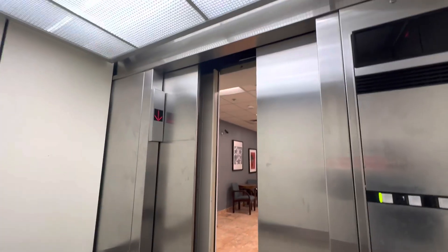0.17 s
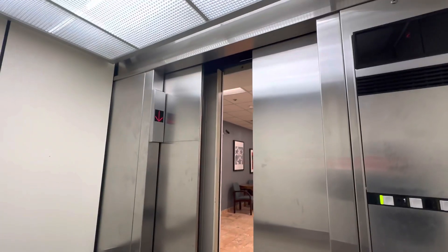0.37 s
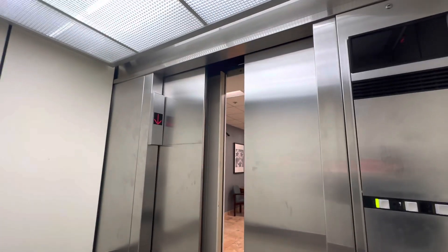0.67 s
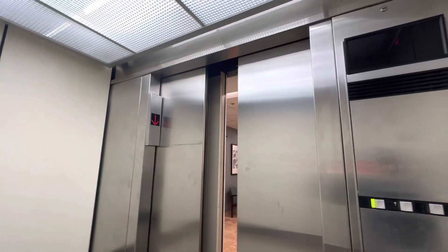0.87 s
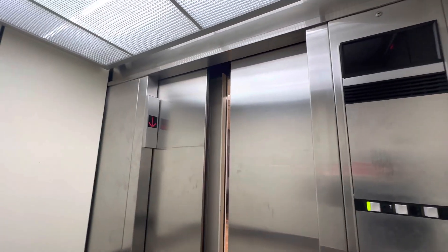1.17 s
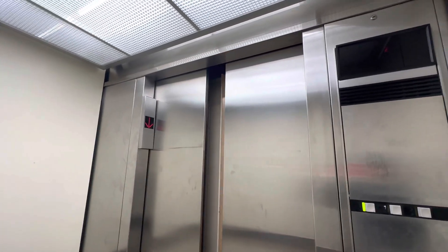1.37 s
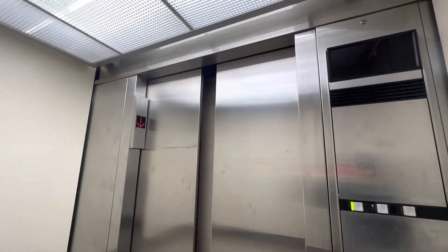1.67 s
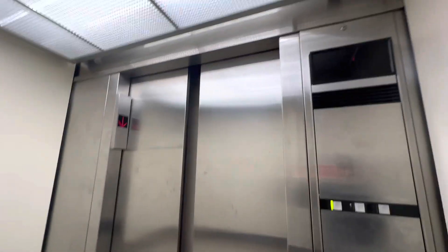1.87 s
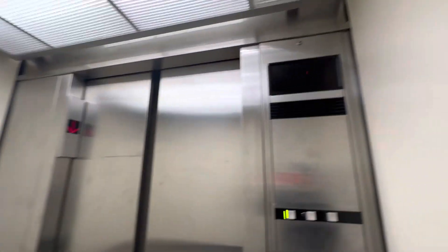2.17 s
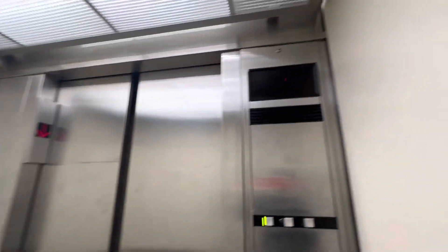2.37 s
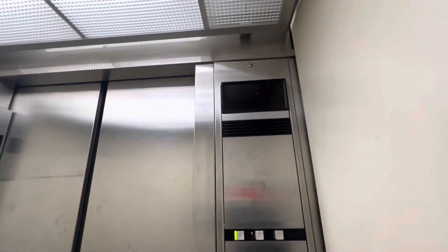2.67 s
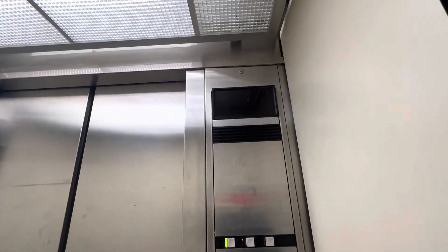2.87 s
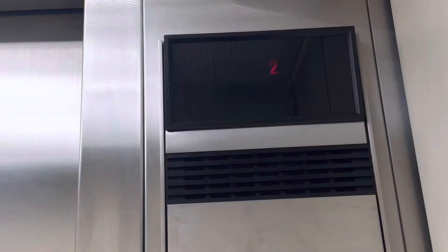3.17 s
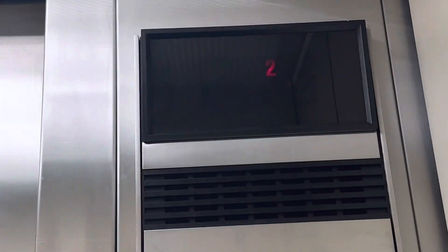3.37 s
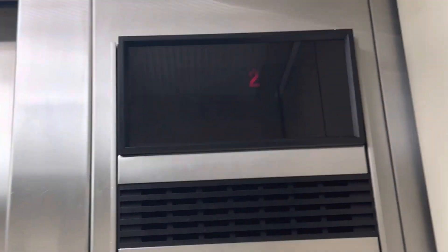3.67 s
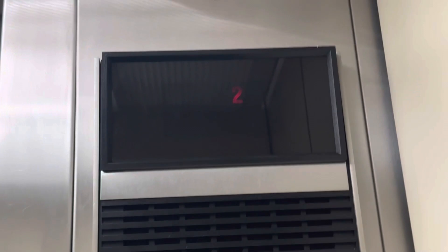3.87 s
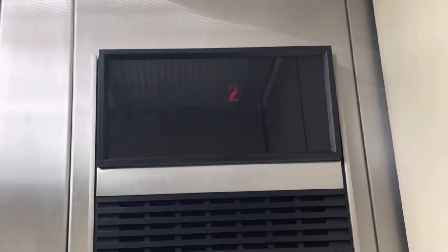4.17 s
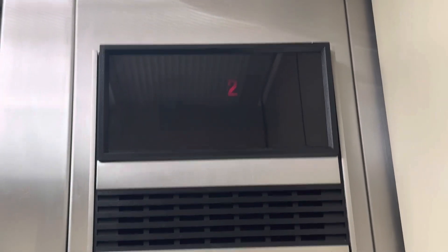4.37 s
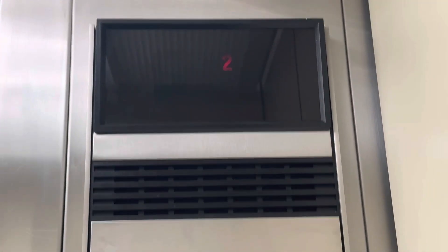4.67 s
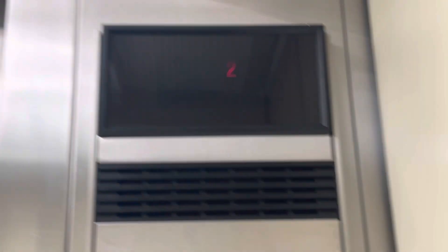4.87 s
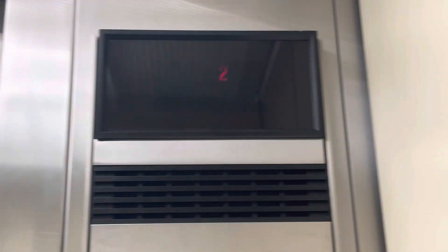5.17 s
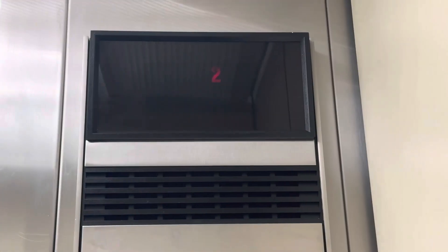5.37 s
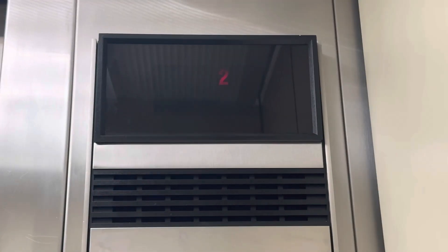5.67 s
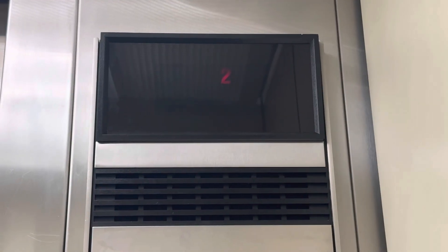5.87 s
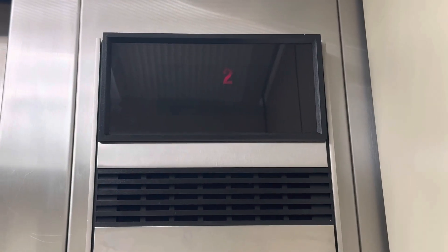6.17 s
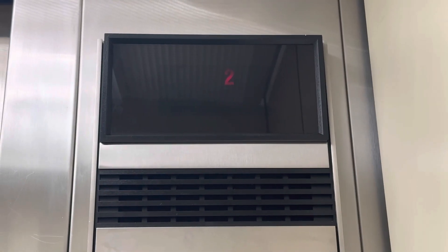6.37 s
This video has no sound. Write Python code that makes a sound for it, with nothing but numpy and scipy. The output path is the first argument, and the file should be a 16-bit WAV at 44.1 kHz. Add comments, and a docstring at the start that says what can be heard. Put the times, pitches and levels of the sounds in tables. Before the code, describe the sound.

A steel elevator door rumbles shut with roller squeaks, then a latch clicks and the car starts moving over a steady fan hum.

```python
"""Inside a steel lift car

A ceiling fan hums and blows, and the air of the car booms in its low modes. The door rumbles shut on
squeaking rollers, with grit ringing in the sheet steel, cloth rustling and small ticks. Halfway the
microphone narrows its focus, which dulls the air noise and pulls it to the centre. Then a latch
clicks, the car jolts, and boom and hum grow a little as it gathers speed."""
import sys
import numpy as np
from scipy import signal
from scipy.io import wavfile

SR = 44100
rng = np.random.default_rng(int(sys.argv[2]) if len(sys.argv) > 2 else 0)


def waveform_to_disk(signal):
    """Save audio, clipped to [-1, 1], as 16-bit WAV at the path in sys.argv[1]."""
    frames = np.transpose(np.atleast_2d(signal))
    scaled = np.clip(frames, -1, 1) * 32767
    samples = np.round(scaled).astype(np.int16)
    wavfile.write(sys.argv[1], SR, samples)


N = 287091
TIME = np.arange(N) / SR
FOCUS_S, FOCUS_FADE_S = 3.05, 0.063   # the microphone goes from wide to narrow
BASS_SWELL_S, BASS_SWELL_TAKES_S = 5.1, 0.57   # hum and low modes grow late in the ride


# The partials of the hum. Each row: multiple of the hum pitch, relative level in dB.
HUM_PARTIALS = [(1, 1), (2, -10), (3, -24)]
# Thin whines. Each row: pitch in Hz, waver in Hz, base level in dB in wide focus, then in narrow focus.
WHINES = [(540, 2.2, -49.5, -64), (616, 2.8, -59.5, -68), (683.2, 2.2, -53.5, -59.5),
          (805, 4.7, -66.5, -67), (1006, 3.0, -65.5, -73)]

def fan_motor():
    """The motor hums with two overtones, stepping up under way; thin whines waver above it."""
    rest_hz, travel_hz, rest_db, travel_gain_db = 121.45, 122.6, -38, 2.5
    pitch_hz = rest_hz + (travel_hz - rest_hz) * ramp(4.6, takes_s=0.56) + 0.578 * drift(2.86)
    level_db = rest_db + travel_gain_db * ramp(BASS_SWELL_S, BASS_SWELL_TAKES_S) + 1.5 * drift(2.5)
    phase, hum = phase_of(pitch_hz), 0
    for multiple, db in HUM_PARTIALS:
        gain = from_db(db + 1.06 * drift(6))
        slip_rad = 0.15 * multiple * drift(7) + rng.uniform(0, 2 * np.pi)
        hum += gain * np.sin(multiple * phase + slip_rad)
    out = np.sqrt(2) * from_db(level_db) * hum * sides_db(-0.7, 0.7)
    for hz, waver_hz, wide_db, narrow_db in WHINES:
        phase = phase_of(hz + waver_hz * drift(5.25))
        whine = np.sin([phase, phase + 2])   # standing waves shift the phase between the ears
        out += from_db(by_focus(wide_db, narrow_db) + 2.46 * drift(2.9)) * whine * sides_db(5, 2.5)
    return out


# The boom of the car. Each row: mode in Hz, resonator width in Hz, relative level in dB,
# left-right likeness (1 is mono).
AIR_MODES = [(42.05, 24, -13, 0.88), (73.4, 28, -7.5, 1), (90, 9.8, -0.5, 1), (108.7, 5.4, -13.5, 0.99),
             (121.66, 11.6, -3.5, 1), (149, 9, -7, 0.99), (171.4, 9.4, -13.5, 1), (223.5, 17.4, -1, 1),
             (291.6, 20.4, -9, 1), (318.8, 11, -12, 0.47), (360.3, 18.4, -9, 0.63), (402, 28, -11.5, 0.029),
             (434.7, 17, -13.5, 0.18)]

def car_boom():
    """Turbulence keeps the air modes ringing; they grow as the door closes and as the car travels."""
    low_db = -40 - 4.5 * (1 - ramp(0, takes_s=0.36))   # weak while the doorway is wide open
    upper_db = -44 - 3.5 * (1 - ramp(0, takes_s=2.4))   # growing until the door seals
    speed = ramp(4.24, takes_s=0.66)
    bass_swell = ramp(BASS_SWELL_S, BASS_SWELL_TAKES_S)
    out = 0
    for hz, width_hz, mode_db, likeness in AIR_MODES:
        turbulence = rng.standard_normal((2, N))
        ring = resonate(resonate(turbulence, hz, width_hz), hz, 2 * width_hz)
        rest_db = low_db if hz < 200 else upper_db
        travel_db = 0.5 * bass_swell if hz < 250 else 4 * speed
        out += from_db(mode_db + rest_db + travel_db) * spread(unit_rms(ring), likeness)
    shudder = swell(3.4, peak_db=-7, rise_s=0.075, fall_s=0.16)   # the start shakes all modes
    return out * sides_db(-0.6, 0.6) * (1 + shudder)


# Dull thuds. Each row: start in seconds, level in dB, pitch in Hz, seconds to fall 60 dB.
JOLTS = [(0.24, -15, 146.6, 0.136), (0.28, -27, 94.6, 0.27), (3.692, -27, 93, 0.38), (3.7, -30, 43.2, 0.69),
         (3.72, -34.5, 350.5, 0.25), (3.764, -13.5, 102, 0.14), (3.795, -19.5, 87.03, 0.22),
         (3.848, -23.5, 115, 0.17), (3.752, -27.5, 209, 0.26), (3.86, -27, 72.47, 0.22)]

def jolts():
    """A soft push sets a wall panel swinging briefly."""
    out, t = np.zeros(N), np.arange(SR // 2) / SR
    for start_s, db, hz, t60 in JOLTS:
        attack = np.minimum(t * hz / 1.47, 1)   # about one and a half cycles
        at = round(start_s * SR)
        out[at:at + len(t)] += attack * from_db(db - 60 * t / t60) * np.sin(2 * np.pi * hz * t)
    return out * sides_db(-0.5, 0.5)


# The body of the door leaf. Each row: resonance in Hz, width in Hz, relative level in dB.
DOOR_MODES = [(393, 54, 7.5), (586, 190, 1.5), (706, 67, -3), (780, 340, -11), (444, 40, -1), (532, 40, -1),
              (920, 32, 0), (1002, 40, 0.5), (1150, 70, 0.5), (1303, 120, -3), (2023, 680, -11.5)]

def door_rumble():
    """Rollers on a bumpy track rumble in the door leaf, each resonance surging on its own."""
    rattle_db, surge_db, stop_s, fade_db_per_s = 1.5, 3.5, 2.45, 44
    rattle = rng.standard_normal((2, N)) * from_db(rattle_db * drift(45))
    leaf = 0
    for k, (hz, width_hz, db) in enumerate(DOOR_MODES):
        leaf += (-1) ** k * from_db(db + surge_db * drift(4.6)) * resonate(rattle, hz, width_hz)
    leaf = butterworth(leaf, 4, 3200, "lowpass")   # rubber tyres pass no treble
    level_db = -46 - fade_db_per_s * np.maximum(TIME - stop_s, 0)
    return unit_rms(leaf) * from_db(level_db) * sides_db(1.5, -1.5)


# Roller squeaks. Each row: start and length in seconds, first and last pitch in Hz, level in dB.
SQUEAKS = [(.2, .035, 2870, 2850, -58), (.248, .052, 2850, 2790, -48.5), (.3, .045, 2800, 2830, -53),
           (.275, .082, 2990, 3010, -54), (.343, .025, 2790, 2780, -51), (.345, .055, 2330, 2350, -59),
           (.408, .035, 2750, 2900, -56), (.425, .035, 2670, 2645, -56), (1.29, .04, 2900, 2900, -66)]

def roller_squeaks():
    """A door roller sticks and slips, in tones that glide, waver and flutter."""
    edge_s, waver_hz, flutter_db = 0.008, 26, 3
    out = 0
    for start_s, length_s, first_hz, last_hz, db in SQUEAKS:
        end_s = start_s + length_s
        glide_hz = np.interp(TIME, [start_s, end_s], [first_hz, last_hz])
        phase = phase_of(glide_hz + waver_hz * drift(60))
        envelope = ramp(start_s, edge_s) * (1 - ramp(end_s - edge_s, 2 * edge_s))
        out += from_db(db + flutter_db * drift(60)) * envelope * np.sin([phase, phase + 1.5])
    return np.sqrt(2) * out


# The ring of the sheet steel. Each row: mode in Hz, width in Hz, relative level in dB.
STEEL_MODES = [(2820, 170, 8.5), (4540, 105.9, 1), (5948, 100, -10.5), (6200, 74, -11.5), (7030, 150, -20),
               (8300, 100, -14), (8750, 65.94, -5), (9500, 300, -10), (10200, 450, -9)]
# Crunches as the rollers cross grit. Each row: peak time in seconds, level in dB.
GRIT_PATCHES = [(.12, -62), (.27, -54), (.56, -55.5), (1.0, -72), (1.3, -70)]

def track_grit():
    """Random grains under the rollers strike the modes of the sheet steel unevenly."""
    grains_per_s, bed_db, door_meets_s = 400, -73, 1.35
    struck = rng.random(N) < grains_per_s / SR
    grains = struck * from_db(2.65 * np.minimum(rng.exponential(1, N), 4))
    ring = 0
    for hz, width_hz, db in STEEL_MODES:
        strikes = grains * rng.standard_normal((2, N)) + 1e-18
        ring += from_db(db) * resonate(strikes, hz, width_hz)
    ring = butterworth(ring, 6, 15000, "lowpass")   # grains give a little, which dulls them
    patches = sum(swell(peak_s, db, rise_s=0.076, fall_s=0.1156) for peak_s, db in GRIT_PATCHES)
    return unit_rms(ring) * (from_db(bed_db) + patches) * (1 - ramp(door_meets_s, takes_s=0.03))


# Ticks, scrapes and the latch. Each row: start in seconds, level in dB, centre in Hz,
# resonator width in Hz, attack in seconds, seconds to fall 60 dB.
TICKS = [(0.249, -53, 9200, 1200, 0.0088, 0.13), (.113, -56, 6500, 5000, .001, .04),
         (0.17, -61, 10000, 900, .004, .08), (0.26, -53, 8600, 600, .002, .1),
         (.256, -56, 5500, 5000, .001, .04), (.325, -57, 9700, 900, .004, .08),
         (.552, -52, 7800, 1800, .002, .09), (.545, -57, 5800, 1100, .01, .15),
         (.8, -65, 8500, 120, .03, 0.28), (.834, -58, 5500, 4000, .002, .05),
         (.976, -60, 6800, 900, .002, .05), (1.7, -56, 5000, 4000, .001, .05),
         (.108, -55, 10000, 1500, .004, 0.1118), (.208, -59, 4700, 1500, .002, .05),
         (0.55, -57, 6767, 1500, 0.02324, .2), (.72, -50.5, 1600, 1500, 0.12, .35),
         (.977, -60, 4100, 900, .002, .1), (.98, -63.5, 8000, 300, .004, .12),
         (0.99, -70, 15000, 1500, .008, .15), (1.17, -61, 16800, 1200, 0.055, 0.33),
         (1.222, -65, 7150, 500, .006, .2), (1.297, -60, 4500, 3000, .002, .08),
         (1.298, -61, 8200, 500, .003, .12), (1.409, -41, 750, 900, .001, .1),
         (1.606, -59, 4300, 4000, .006, 0.21), (2.783, -67, 4285, 2000, .002, .05),
         (1.84, -67, 10000, 2000, 0.023, 0.15), (1.8, -55, 9300, 3500, .0005, .02),
         (2.33, -68, 15000, 900, .008, .2), (2.33, -68, 13300, 700, .008, .2),
         (2.34, -63, 8100, 500, .02, .3), (2.563, -72, 14000, 1200, .004, .15),
         (2.37, -43, 1760, 1200, 0.024, 0.25), (2.562, -59, 8900, 3000, .005, .1),
         (3.663, -58, 8800, 1400, 0.0006, 0.04), (3.668, -64, 8300, 1300, 0.0023, 0.2),
         (3.638, -56, 1500, 1000, .002, .06), (3.663, -39.5, 1600, 650, .001, 0.074),
         (3.68, -48, 1680, 700, 0.011, 0.22), (3.664, -63, 5016, 5000, .001, .06),
         (3.665, -56, 1480, 1570, 0.002054, 0.57)]

def ticks():
    """Each tick or scrape is a burst of band noise that swells and dies."""
    out, t = np.zeros((2, N)), np.arange(SR // 2) / SR
    for start_s, db, hz, width_hz, attack_s, t60 in TICKS:
        noise = spread(rng.standard_normal((2, len(t))), likeness=0.51)
        burst = resonate(resonate(noise, hz, width_hz), hz, width_hz)
        envelope = np.minimum(t / attack_s, 1) * from_db(-60 * np.maximum(t - attack_s, 0) / t60)
        at = round(start_s * SR)
        out[:, at:at + len(t)] += from_db(db) * envelope * unit_rms(burst)
    return out


# Rubs of cloth. Each row: peak time in seconds, base level in dB, rise and fall in seconds per 10 dB,
# brightness in dB per octave.
CLOTH_RUBS = [(0.118, -52.5, 0.054, 0.023, 2.5), (.23, -65, 0.048, .025, 3),
              (.26, -54.5, 0.0075, 0.05844, -2), (.34, -55.5, 0.054, 0.018, 1), (.41, -57, 0.049, 0.11, -1),
              (.56, -51, 0.057, 0.074, -0.5), (.86, -57.5, 0.36, .05, -2), (.98, -57.5, 0.013, 0.18, 4),
              (1.23, -57, 0.043, 0.096, 4), (1.31, -59.5, .04, .04, 2), (1.62, -56, 0.01829, 0.039, -7),
              (1.87, -65.5, 0.058, .05, -4), (2.38, -51, 0.3, 0.25, 1)]
# The tone of the cloth. Each row: frequency in Hz, relative level in dB.
CLOTH_COLOUR = [(1650, -25), (2800, 9), (4200, 6.5), (5100, 7), (7600, 5), (8700, 5.5), (10100, 2),
                (11200, -9.5), (12000, -30), (13500, -18), (14800, -9), (15700, -7)]

def cloth_rustle():
    """Cloth rubs in dense uneven grains over a faint dying bed, until the focus narrows."""
    bed_power, bed_tilt_db = from_db(-60 - 7 * TIME) ** 2, -4.5
    power, weighted_tilt = bed_power, bed_power * bed_tilt_db
    for peak_s, db, rise_s, fall_s, rub_tilt_db in CLOTH_RUBS:
        rub_power = swell(peak_s, db, rise_s, fall_s) ** 2
        power = power + rub_power
        weighted_tilt += rub_power * rub_tilt_db
    tilt_db = weighted_tilt / power   # the loudest rub leads the brightness
    grains = rng.standard_normal((2, 2, N)) * from_db(drift(180) + 0.61 * drift(30))
    cloth = 0
    for hz, band in bands(grains, lowest_hz=2536):
        colour_db = at_hz(CLOTH_COLOUR, hz) + tilt_db * np.log2(hz / 7000)
        cloth += from_db(colour_db + 1.6 * drift(13)) * band
    fade_out = 1 - ramp(FOCUS_S - 0.02, takes_s=0.02)
    return unit_rms(cloth) * np.sqrt(power) * sides_db(3, 2) * fade_out


# The tone of the air in wide and narrow focus. Each row: frequency in Hz, noise density in dB.
AIR_COLOUR_WIDE = [(15, -100), (30, -69), (55, -74), (90, -68.5), (240, -67), (270, -68.5), (320, -75),
                   (400, -72), (700, -72.5), (1300, -78), (2600, -86.5), (3400, -101.5), (9700, -108),
                   (11200, -115), (12200, -131), (15700, -136)]
AIR_COLOUR_NARROW = [(15, -100), (30, -72), (55, -70), (90, -68), (260, -70), (450, -73), (620, -78),
                     (1000, -84), (1800, -81), (2300, -91), (3500, -103), (6800, -114), (9700, -122),
                     (11000, -131), (15700, -132)]
# Where the air leans. Each row: frequency in Hz, left minus right in dB.
AIR_PAN_WIDE = [(30, 0), (60, -4), (110, -1.5), (200, -7), (380, 7.5), (700, 3.5), (1290, 3), (2380, 1),
                (4400, 10.5), (8120, -2), (15000, -21)]
AIR_PAN_NARROW = [(60, 0), (110, 3), (200, -5.5), (380, -4.5), (700, 6), (1290, -4.5), (2380, -2),
                  (4400, 0), (8120, 2), (15000, 0)]
# How centred the air feels. Each row: frequency in Hz, left-right likeness (1 is mono).
AIR_LIKENESS_WIDE = [(30, 0.98), (60, 0.66), (130, 0.89), (290, -0.72), (640, -0.12), (1400, -0.17),
                     (3100, 0.12), (6800, 0.094), (15000, -1.2)]
AIR_LIKENESS_NARROW = [(60, 0.97), (200, 1), (340, -0.85), (600, 0.26), (1000, 0.54), (1600, -0.21),
                       (2600, 0.82), (3600, 1), (6500, 0.99), (8000, 0.77), (15000, -0.35)]

def fan_air():
    """A broad rush of blown air, coloured and placed by the focus of the microphone."""
    out = 0
    for hz, band in bands(rng.standard_normal((2, 2, N)), lowest_hz=20.69):
        level_db = by_focus(at_hz(AIR_COLOUR_WIDE, hz), at_hz(AIR_COLOUR_NARROW, hz))
        pan_db = by_focus(at_hz(AIR_PAN_WIDE, hz), at_hz(AIR_PAN_NARROW, hz)) * [[0.5], [-0.5]]
        likeness = by_focus(at_hz(AIR_LIKENESS_WIDE, hz), at_hz(AIR_LIKENESS_NARROW, hz))
        out += from_db(level_db + pan_db + 1.5 * drift(7.8)) * spread(band, likeness)
    return out * np.sqrt(SR / 2)   # unit white noise holds 2 / SR per Hz


def from_db(db):
    """Gain of a level in dB."""
    return 10 ** (np.asarray(db) / 20)


def sides_db(left_db, right_db):
    """Gains for the left and right channels."""
    return from_db([[left_db], [right_db]])


def unit_rms(x):
    """Scales to unit power."""
    return x / np.sqrt(np.mean(x ** 2) + 1e-20)


def phase_of(pitch_hz):
    """Running phase in radians of a moving pitch."""
    return 2 * np.pi * np.cumsum(pitch_hz) / SR


def at_hz(curve, hz):
    """Reads a curve on a log frequency axis."""
    points_hz, values = np.array(curve).T
    return np.interp(np.log(hz), np.log(points_hz), values)


def by_focus(wide, narrow):
    """Glides from the wide to the narrow value as the focus changes."""
    return np.interp(TIME, [FOCUS_S, FOCUS_S + FOCUS_FADE_S], [wide, narrow])


def ramp(start_s, takes_s):
    """A straight fade from 0 to 1."""
    return np.clip((TIME - start_s) / takes_s, 0, 1)


def swell(peak_s, peak_db, rise_s, fall_s):
    """Gain that climbs 10 dB per rise time, then sinks 10 dB per fall time."""
    t = TIME - peak_s
    return from_db(peak_db - 10 * np.maximum(-t / rise_s, t / fall_s))


def drift(rate_hz):
    """Smooth random wander of unit power."""
    hop, settle = 40, 2000
    pole = np.exp(-2 * np.pi * rate_hz * hop / SR)
    noise = rng.standard_normal(N // hop + settle + 2)
    slow = signal.lfilter([1], [1, -2 * pole, pole * pole], noise)[settle:]
    return np.interp(np.arange(N) / hop, np.arange(len(slow)), unit_rms(slow))


def resonate(x, hz, width_hz):
    """Two-pole resonance."""
    r = np.exp(-np.pi * width_hz / SR)
    return signal.lfilter([1 - r, 0, r - 1], [1, -2 * r * np.cos(2 * np.pi * hz / SR), r * r], x)


def butterworth(x, order, edges_hz, kind):
    """Filter with a flat passband."""
    return signal.sosfilt(signal.butter(order, edges_hz, kind, fs=SR, output="sos"), x)


def spread(pair, likeness):
    """Two unrelated signals become left and right of the given likeness."""
    likeness = np.clip(likeness, -1, 1)
    mid, side = np.sqrt(1 + likeness) * pair[0], np.sqrt(1 - likeness) * pair[1]
    return np.array([mid + side, mid - side]) / np.sqrt(2)


def bands(noises, lowest_hz):
    """Yields centre and stereo signal of quarter-octave bands, cut from two noises in turn."""
    edges = lowest_hz * 2 ** np.arange(0, np.log2(17000 / lowest_hz), 1 / 4)
    for k, (low, high) in enumerate(zip(edges, edges[1:])):
        yield np.sqrt(low * high), butterworth(noises[k % 2], 4, [low, high], "bandpass")


def scene():
    """The drone of the car, the closing door and the small sounds around them."""
    drone = fan_air() + car_boom() + fan_motor()
    door = door_rumble() + roller_squeaks() + track_grit()
    return drone + door + cloth_rustle() + ticks() + jolts()


def record(dry):
    """The microphone has a deep dip in the treble; the top is cut."""
    dip_hz, cutoff_hz = [11720, 13200], 15700
    dipped = butterworth(dry, 2, dip_hz, "bandstop")
    return signal.sosfilt(signal.ellip(12, 0.5, 70, cutoff_hz, fs=SR, output="sos"), dipped)


dry = scene()
out = record(dry)
waveform_to_disk(out)
```